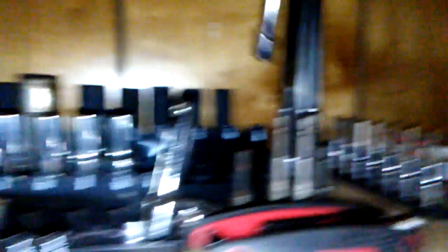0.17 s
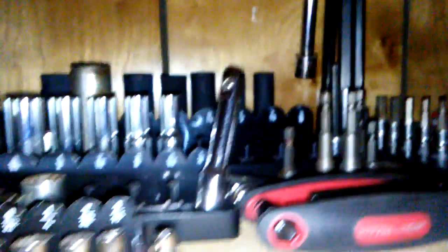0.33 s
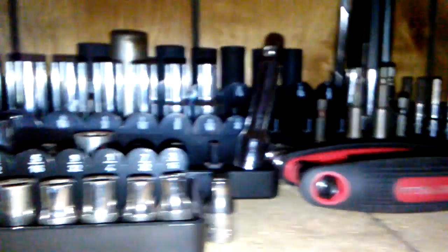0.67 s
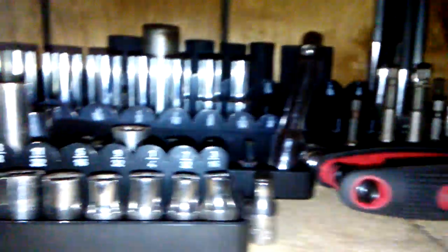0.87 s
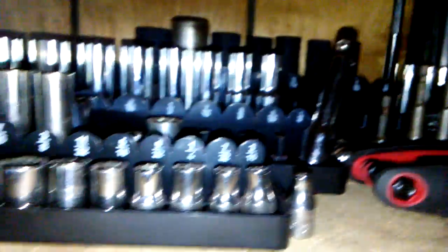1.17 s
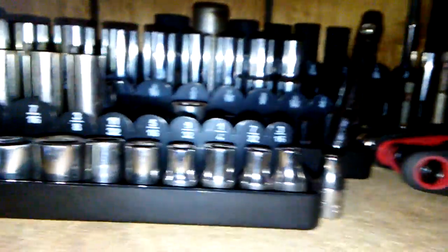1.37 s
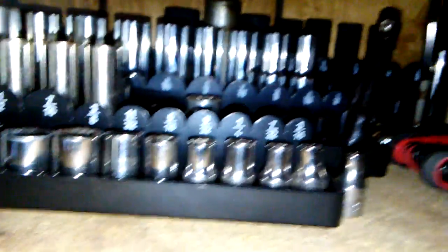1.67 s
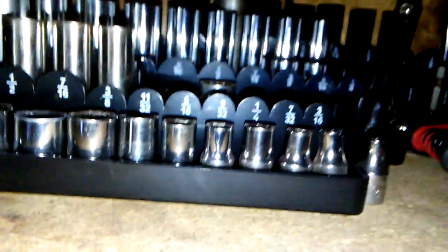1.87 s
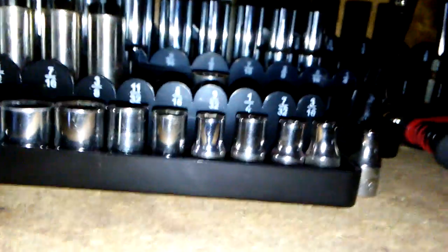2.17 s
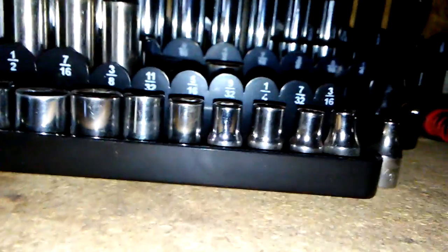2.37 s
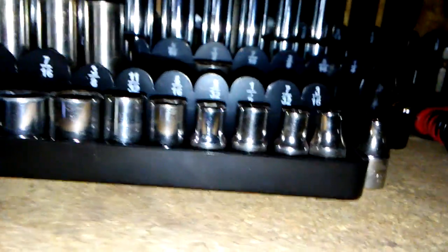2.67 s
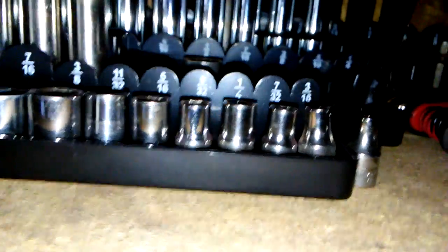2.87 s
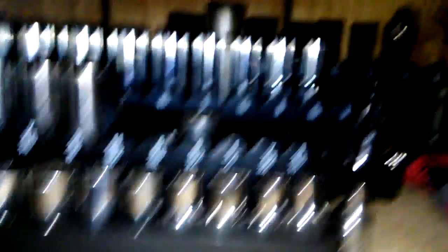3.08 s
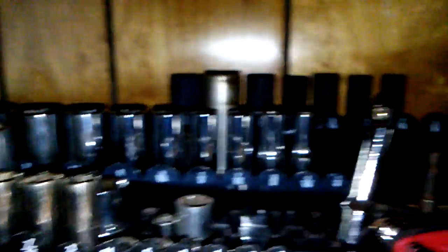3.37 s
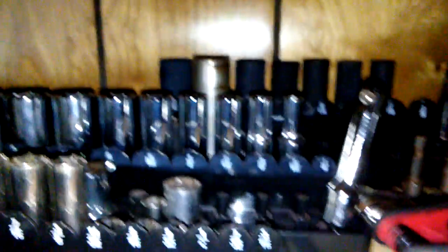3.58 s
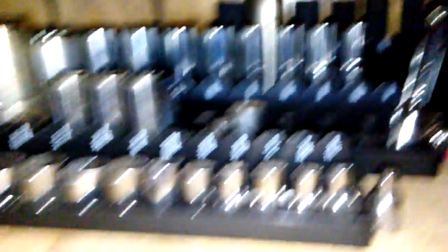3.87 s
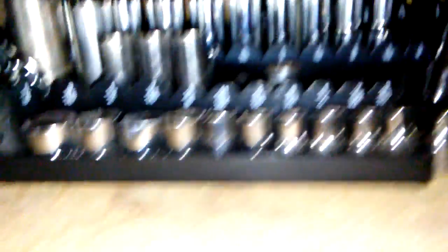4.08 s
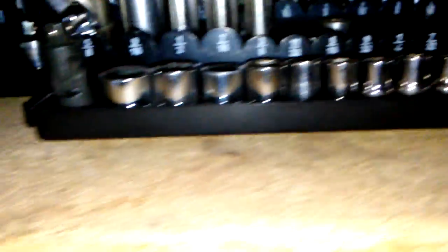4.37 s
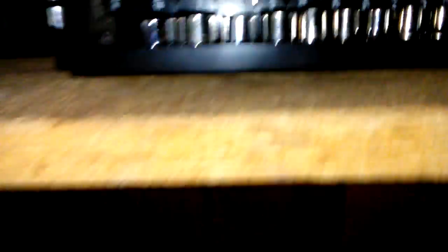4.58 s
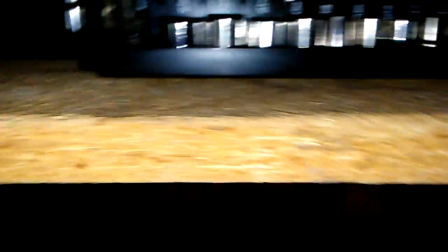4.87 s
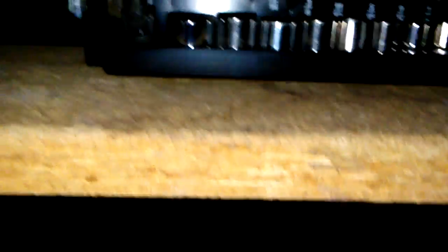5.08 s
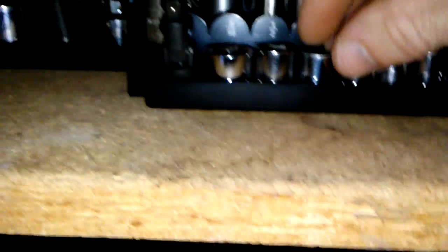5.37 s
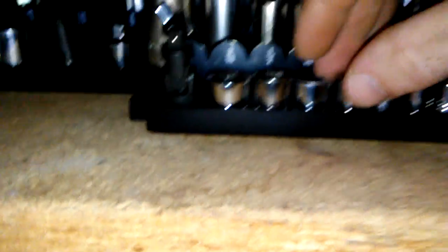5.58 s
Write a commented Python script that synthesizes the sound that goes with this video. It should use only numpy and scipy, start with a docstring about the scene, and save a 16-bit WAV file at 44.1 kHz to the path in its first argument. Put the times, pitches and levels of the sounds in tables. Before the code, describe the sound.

Close, sharp clattering knocks of a socket-filled tray, bright metal clinks, a quiet pause, then faint rubbing and scraping in a small garage.

```python
"""Steel sockets in a plastic tray, garage bench

Chrome sockets are handled in a tray on a wooden bench, close to a phone's microphone.
The tray knocks as ringing modes over a dense clatter; steel clinks as bell-like modes behind a hard tick.
Sleeve, hand and a dragged socket rub as grainy filtered noise, over a faint crackling hiss.
A small garage rings on behind as a decaying diffuse tail."""
import sys
import numpy as np
from scipy import signal
from scipy.fft import rfft, irfft
from scipy.io import wavfile
from scipy.ndimage import uniform_filter1d, minimum_filter1d

SR = 44100
rng = np.random.default_rng(int(sys.argv[2]) if len(sys.argv) > 2 else 0)


def to_wav(s):
    """Save 16-bit WAV."""
    ch = np.atleast_2d(s).T  # columns
    pcm = np.round(np.clip(ch, -1, 1) * 32767)  # PCM
    wavfile.write(sys.argv[1], SR, pcm.astype(np.int16))


N = 252693
TIME = np.arange(N) / SR  # seconds

# Faint background hiss. Each row: frequency in Hz, relative density in dB per Hz.
AIR_SPECTRUM = [(25, -12), (50, -7), (82, 3), (110, -12), (200, -6.5), (350, -2), (1000, -7), (3900, -11),
                (4500, -15.5), (5500, -14.5), (7000, -19), (15500, -22.5)]
# Hiss of the microphone itself. Each row: frequency in Hz, relative density in dB per Hz.
MIC_HISS_SPECTRUM = [(100, 1), (1000, -2.5), (3900, 2), (4700, -17.5), (6000, -9), (7500, 3), (12000, 1),
                     (15500, -10)]
# Overall tone of the recorded sound, thinner near 5 kHz. Each row: frequency in Hz, gain in dB.
OVERALL_TONE = [(20, -3.5), (100, 5), (4100, 4), (4600, -5.5), (5200, -6.5), (5900, -7.5), (6600, 1),
                (16000, 4.5)]
# Decay of the tail as heard, by band, thin and short near 5 kHz.
# Each row: centre in Hz, t60 in seconds, relative level in dB.
TAIL_BANDS = [(99.66, 0.36, 5), (400, .42, 1.5), (1100, 0.52, -2.5), (2170, 0.42, -3.5), (3520, 0.54, -2),
              (5000, 0.087, -11), (6750, 0.29, 3), (14000, 0.41, -2)]
# Cloth of the sleeve. Each row: frequency in Hz, relative density in dB per Hz.
SLEEVE_SPECTRUM = [(3000, -36.5), (5500, -27), (7300, -2), (8800, 2), (10500, -5.5), (13000, -12.5),
                   (16000, -19.5)]
# Hand on the wood. Each row: frequency in Hz, relative density in dB per Hz.
SHUFFLE_SPECTRUM = [(30, -21), (85, 0), (125, -11.5), (350, 0.5), (650, 1), (1000, 1), (1250, -1.5),
                    (1800, 1), (2300, 0.5), (3000, -4), (3900, -7), (4600, -25), (12000, -35.5)]
# Strokes of sleeve and hand over the bench. Each row: start in seconds, length in seconds,
# relative swish in dB, relative low shuffle in dB.
BRUSH_STROKES = [ (2.251, 0.082, -62, -57), (3.745, 0.26, -46, -57.5), (3.825, 0.048, -40.5, -72),
                 (4.019, 0.11, -76.5, -49.5), (4.081, 0.16, -60, -53.5), (4.223, 0.072, -66, -43.5),
                 (4.273, 0.13, -58, -55.5), (4.483, 0.052, -60.5, -61.5), (4.846, 0.023, -49.5, -68), ]
# Socket dragged in the tray. Each row: frequency in Hz, relative density in dB per Hz.
DRAG_SPECTRUM = [(100, -22), (350, -3), (900, -5.5), (1900, -6.5), (2400, 4), (2800, -6), (3200, 8.5),
                 (3500, -1.5), (3850, 3), (4500, -26), (5400, -14), (8300, -7.5), (11000, -21),
                 (16000, -37)]
# Pulls on that socket. Each row: start in seconds, length in seconds, level in dB.
DRAG_PULLS = [(5.264, 0.031, -45.5), (5.29, .12, -54), (5.458, 0.1, -60), (5.57, 0.11, -60.5)]
# Its sudden slips. Each row: start in seconds, level in dB, t60 in seconds.
DRAG_SLIPS = [(5.2632, -45, 0.12), (5.3170, -52.5, 0.031), (5.351, -49.5, 0.039)]
# Clinks of socket on socket. Each row: start in seconds, relative strength in dB,
# hardness in dB over strength, larger neighbour's ring over the small socket's in dB,
# neighbour's pitch in Hz (moves its modes in proportion), free ringing time in seconds.
CLINK_EVENTS = [ (1.129, -15.5, -14, -25.5, 3772, .062), (1.2437, -38.5, 1, 10, 3760, 0.017),
                (1.261, -45.5, 6, 4, 3820, 0.022), (1.3275, -31, 12, -7.5, 3940, 0.023),
                (1.415, -36, -4, 26, 3840, 0.01), (1.7873, -30, -3.5, 0.5, 3746, 0.023),
                (2.29, -17, 10.5, -23, 3930, .084), (2.399, -3.5, 5.5, -16.5, 3745, 0.041),
                (2.648, -36, 2, -1, 3770, 0.03), (2.765, -32, -6, -3, 3785, 0.0094),
                (4.057, -29.5, -8.5, -31, 3590, 0.032), (4.219, -45.5, -2.5, -19, 3760, .06), ]
# Mode families of a clink. In Hz: neighbour's ring, second wall mode, main ring from and to, highest mode.
CLINK_FAMILIES_HZ = [3730, 6730, 7200, 8500, 12330]
# Modes of the steel sockets. Each row: frequency in Hz, relative level in dB, t60 in seconds.
SOCKET_MODES = [(2730, -12, 0.017), (3320, -8, 0.032), (3695, 0, 0.14), (3920, -4, 0.06),
                (6700, -21, 0.054), (6760, -11, .06), (7340, -18.5, 0.12), (7300, -20, 0.11),
                (7499, -7, 0.15), (7510, -8.5, 0.24), (8476, -28, 0.091), (11290, -18, 0.083),
                (12332, -7, .22)]
# Hard tick of steel contact. Each row: frequency in Hz, relative density in dB per Hz.
TICK_SPECTRUM = [(500, -26.5), (1700, -12), (3200, -1.5), (5000, -7.5), (7500, 10), (9000, -5),
                 (12000, -4.5), (16000, -23.5)]
# Knocks of the tray on the bench. Each row: start in seconds, relative strength in dB, heft (extra bass) in dB,
# hardness (treble tilt) in dB per octave, t60 of the dense ring in seconds,
# two resonances favoured by the point struck in Hz and Hz, relative room share in dB.
TRAY_KNOCKS = [ (0.9588, 20, -13, 0.5, 0.041, 680, 1570, -13), (1.131, -11.5, 2, 0.5, 0.081, 555, 1560, -4),
               (1.2441, -13.5, 3, 2, .12, 552, 1520, -2), (1.3090, 24, 3.5, -1, 0.016, 404, 2130, -10.5),
               (1.3263, 24, 1, -1.8, .09, 460.6, 195.2, -17),
               (1.6133, 23, -3.5, -2.07, 0.097, 470, 1248, -12.5),
               (1.786, 5.5, 6.5, 1.3, 0.096, 535, 1614, -10.5),
               (2.13, -14.5, 12.5, -1.5, 0.059, 192, 362, -9.5),
               (2.2943, -4.5, -1.5, 2.5, 0.15, 1700, 3220, -12.5),
               (2.3430, 26, -6, 1.4, 0.036, 330, 1180, -10.5), (2.3580, 16.5, 3, 0, 0.041, 450, 686, -6),
               (2.3870, 16.5, -0.5, -1.5, 0.15, 384, 960, -9.5),
               (2.7631, -15.5, 4, 2.1, 0.055, 669, 1580, -5),
               (2.8470, -21.5, -3.5, 1.5, 0.062, 720, 1650, -14),
               (4.2180, -8, -13, -2.5, 0.063, 996, 1700, -7),
               (4.2421, -6.5, -7.5, 0.9, 0.024, 1998, 2290, -2.5),
               (4.7990, -24, 10, 2.55, .03, 3220, 3450, -11),
               (4.8380, -27.5, 1, 3.5, 0.018, 7274, 8010, -6), ]
# Modes of the loaded tray. Each row: frequency in Hz, relative spectral peak in dB, t60 in seconds.
TRAY_MODES = [(206, -8.5, 0.34), (325, 6, 0.14), (417, 3, 0.047), (430, 5.5, 0.065), (559.7, 10.5, .11),
              (687, -0.5, .07), (745, -1.5, 0.13), (828, 4, 0.069), (1067, -3, 0.3), (1370, 0.5, 0.1),
              (1660, 5, 0.14), (1638, 1.5, 0.28), (2000, -1.5, 0.026), (2225, 7, 0.031), (3133, -5, 0.026),
              (3590, 3.5, 0.038), (7260, 10.5, .06), (6600, 8, 0.021), (12100, 6.5, 0.024)]
# Spectrum of an ordinary blow. Each row: frequency in Hz, relative level in dB.
BLOW_SPECTRUM = [(40, -28), (90, -22.5), (200, -6.5), (330, -2.5), (600, -1), (1500, -3), (3300, -14),
                 (8000, -21), (15000, -48)]
# Heft lifts the bass below the body; hardness tilts from the body up to the crack.
HEFT_HZ, BODY_HZ, CRACK_HZ = 200, 614, 8000
TOP_HZ = 15900  # upper limit of the recorded band


def undb(db):
    """Decibels to amplitude gain."""
    return 10 ** (np.asarray(db) / 20)


def at_hz(hz, points):
    """Read (Hz, value) points on a log-frequency axis."""
    f, value = np.transpose(points)
    return np.interp(np.log(np.maximum(hz, 1)), np.log(f), value)


def colour(x, points, size=4096):
    """Causal filter through (Hz, dB) points: the cepstrum is folded to give minimum phase."""
    hz = np.arange(size // 2 + 1) * SR / size
    cepstrum = irfft(np.log(undb(at_hz(hz, points))))
    cepstrum[1:size // 2] *= 2
    cepstrum[size // 2 + 1:] = 0
    impulse = irfft(np.exp(rfft(cepstrum)))
    return signal.fftconvolve(x, impulse)[:len(x)]


def fade(t, t60):
    """Exponential decay by 60 dB in t60 seconds."""
    return np.exp(-np.log(1000) * t / t60)


def burst(t, t60, rise):
    """Dense ring of unit energy: noise that builds up and dies away."""
    x = rng.standard_normal(len(t)) * fade(t, t60) * (1 - np.exp(-t / rise))
    return x / np.linalg.norm(x)


def add(out, s, x):
    """Mix x into out from time s in seconds."""
    i = int(s * SR)
    out[i:i + len(x)] += x[:N - i]


def walk(rate):
    """Random levels drawn rate times a second and slewed between; spread near 1."""
    k = max(int(SR / rate), 1)
    held = rng.standard_normal(N)[np.arange(N) // k]
    return 1.2 * uniform_filter1d(held, k)


def friction(spectrum, grain_db, grain_rate):
    """Rubbing noise of unit rms whose strength wanders from one tiny contact to the next."""
    grain = undb(grain_db * walk(grain_rate))
    x = colour(rng.standard_normal(N) * grain, spectrum)
    return x / np.std(x)


def stroke(s, length, attack, release):
    """One rubbing movement swells, holds and dies away; attack and release are shares of its length."""
    u = np.maximum(TIME - s, 0) / length
    swell = 1 - np.exp(-(u / attack) ** 2)
    return swell * np.exp(-np.logaddexp(0, (u - 1) / release))


def hiss(level_db=-70, flicker_db=3.0, ticks_per_s=34, tick_db=9, tick_t60=0.005):
    """Faint background noise flutters; random short swells of it crackle softly."""
    ticks = (rng.random(N) < ticks_per_s / SR) * rng.random(N)
    crackle = signal.fftconvolve(ticks, fade(TIME[:SR // 10], tick_t60))[:N]
    noise = friction(AIR_SPECTRUM, grain_db=flicker_db, grain_rate=50)
    return undb(level_db) * (1 + undb(tick_db) * crackle) * noise


def suppressor(x, hiss_db=-60, open_db=-51):
    """The noise suppressor opens with the sound above 600 Hz and lets the microphone's own hiss through."""
    heard = signal.sosfilt(signal.butter(2, 600, "high", fs=SR, output="sos"), x)
    # mean power of the last 10 ms; abs removes tiny negative rounding errors
    power = np.abs(uniform_filter1d(heard ** 2, SR // 100, origin=SR // 200 - 1))
    opening = power / (power + undb(open_db) ** 2)
    own_hiss = friction(MIC_HISS_SPECTRUM, grain_db=0.0, grain_rate=33)
    return x + opening * undb(hiss_db) * own_hiss


def garage(x):
    """Sound scattered by the walls, as heard: a diffuse noise tail of unit energy, shaped band by band."""
    t = TIME[:SR]
    spectrum, hz = rfft(rng.standard_normal(SR)), np.arange(SR // 2 + 1)
    centres = np.transpose(TAIL_BANDS)[0]
    tail = 0
    for share, (_, t60, db) in zip(np.eye(len(TAIL_BANDS)), TAIL_BANDS):
        # each band crossfades into its neighbours
        band = irfft(spectrum * at_hz(hz, np.c_[centres, share]))
        tail = tail + undb(db) * band * fade(t, t60)
    tail = tail * (1 - np.exp(-(t / 0.0096) ** 2))  # the walls answer after a few milliseconds
    return signal.fftconvolve(x, tail / np.linalg.norm(tail))[:N]


def brush(swish_db=-3.0, shuffle_db=-1):
    """Cloth swishes high; the hand shuffles lower on the wood."""
    swish = friction(SLEEVE_SPECTRUM, grain_db=1.5, grain_rate=360)
    shuffle = friction(SHUFFLE_SPECTRUM, grain_db=2.5, grain_rate=240)
    power = np.zeros((2, N))
    for s, length, high_db, low_db in BRUSH_STROKES:
        gains = undb([high_db + swish_db, low_db + shuffle_db])
        # strokes that overlap add in power
        power += np.outer(gains, stroke(s, length, attack=0.13, release=0.16)) ** 2
    return swish * np.sqrt(power[0]) + shuffle * np.sqrt(power[1])


def drag():
    """A socket sticks and slips along the plastic; each slip is a sudden, fading burst of rubbing."""
    force = np.zeros(N)
    for s, length, db in DRAG_PULLS:
        force += undb(db) * stroke(s, length, attack=.09, release=0.19)
    for s, db, t60 in DRAG_SLIPS:
        add(force, s, undb(db) * fade(TIME[:SR // 2], t60))
    return force * friction(DRAG_SPECTRUM, grain_db=2.5, grain_rate=160)


def clinks(rise=.002, tick_t60=0.034, tick_db=10, second_db=-2, top_db=-18, top_growth=1.35,
           top_hardness=0.25, settled_db=-24, neighbour_rise=.005):
    """Steel on steel: a hard tick, then the socket walls ring like tiny bells until they settle on a neighbour."""
    out, t = np.zeros(N), TIME[:SR // 2]
    for s, strength_db, hard_db, neighbour_db, low_hz, free_s in CLINK_EVENTS:
        # the two sockets share the energy of the blow
        small_db = strength_db - 10 * np.log10(1 + undb(neighbour_db) ** 2)
        contact_db = strength_db + hard_db
        # the second wall mode follows the hard contact; the highest grows faster than the blow
        highest_db = top_db + top_growth * small_db + top_hardness * hard_db
        family_db = [small_db + neighbour_db, contact_db + second_db, small_db, small_db, highest_db]
        blow = np.c_[CLINK_FAMILIES_HZ, family_db]
        ring = 0
        for hz, db, t60 in SOCKET_MODES:
            pitch, swell = hz, rise
            if hz < 5000:  # low modes belong to the larger neighbour touched and build up more slowly
                pitch, swell = hz * low_hz / CLINK_FAMILIES_HZ[0], neighbour_rise
            envelope = fade(t, t60) * (1 - np.exp(-t / swell))
            ring = ring + undb(db + at_hz(hz, blow)) * np.sin(2 * np.pi * pitch * t) * envelope
        # after its free time the ring drops to the settled level
        free = undb(settled_db) + (1 - undb(settled_db)) / (1 + (t / free_s) ** 10)
        tick = colour(burst(t, tick_t60, rise=.0001), TICK_SPECTRUM)
        add(out, s, ring * free + undb(contact_db + tick_db) * tick)
    return out


def knocks(dense_db=0, modes_db=-3, focus_db=8.0, focus_width=0.18, room_focus_db=4, send_db=1,
           echo_s=.005, echo_db=-5):
    """The tray hits the bench: modes ring over its load's dense clatter. Gives direct sound and room feed."""
    direct, feed, t = np.zeros(N), np.zeros(N), TIME[:SR // 2]
    grid = np.geomspace(40, 20000, 200)  # Hz
    modes = 0
    for k, (hz, db, t60) in enumerate(TRAY_MODES):
        # scaled so that a mode's dB sets the height of its spectral peak; signs alternate
        peak = (-1) ** k * undb(db) * 2 * np.log(1000) / (t60 * SR)
        modes = modes + peak * np.sin(2 * np.pi * hz * t) * fade(t, t60)
    bass = at_hz(grid, [(HEFT_HZ, 1), (BODY_HZ, 0)])
    octaves = np.log2(np.clip(grid, BODY_HZ, CRACK_HZ) / BODY_HZ)
    for s, strength_db, heft_db, hardness, t60, first_hz, second_hz, room_db in TRAY_KNOCKS:
        ring = undb(dense_db) * burst(t, t60, rise=0.00028) + undb(modes_db) * modes
        # the loose sockets land a moment after the tray
        landing = np.roll(burst(t, t60, rise=0.00028), int(echo_s * SR))
        ring = ring + undb(echo_db) * landing
        # a flat landing moves the bench and adds bass; a hard corner adds treble
        blow = strength_db + at_hz(grid, BLOW_SPECTRUM) + heft_db * bass + hardness * octaves
        # the point struck decides which modes face the microphone; the walls hear all sides
        focus = sum(np.exp(-(np.log(grid / hz) / focus_width) ** 2) for hz in (first_hz, second_hz))
        add(direct, s, colour(ring, np.c_[grid, blow + focus_db * focus]))
        to_walls = colour(ring, np.c_[grid, blow + room_focus_db * focus])
        add(feed, s, undb(room_db + send_db) * to_walls)
    return direct, feed


def scene(clink_room_db=-17, rub_room_db=-12):
    """All handling sounds close by, with the garage behind them."""
    tray, tray_feed = knocks()
    steel, rubs = clinks(), brush() + drag()
    room = garage(tray_feed + undb(clink_room_db) * steel + undb(rub_room_db) * rubs)
    return (tray + steel + rubs + room + hiss())[None]


def record(dry):
    """The phone's overall tone is applied, its own hiss gated, the peaks held down and the top cut."""
    x = suppressor(colour(dry[0], OVERALL_TONE))
    ceiling, hold = .97, SR // 500  # full scale is 1; hold is 2 ms in samples
    needed = ceiling / np.maximum(np.abs(x), ceiling)
    gain = uniform_filter1d(minimum_filter1d(needed, hold), hold)
    top_cut = signal.ellip(10, .2, 80, TOP_HZ, fs=SR, output="sos")
    return signal.sosfilt(top_cut, x * gain)[None]


dry = scene()
out = record(dry)
to_wav(out)
```